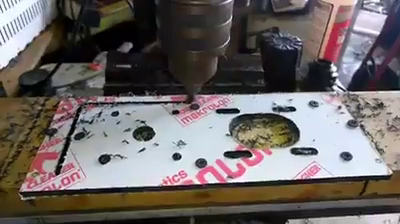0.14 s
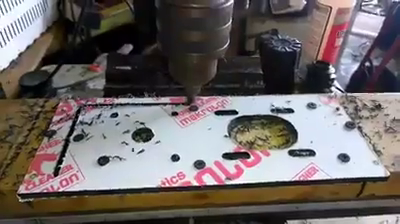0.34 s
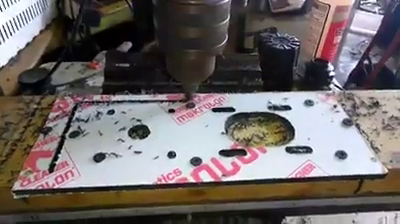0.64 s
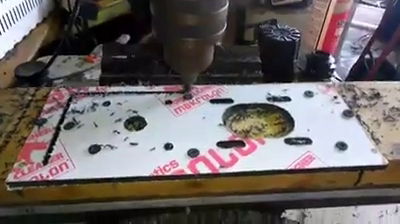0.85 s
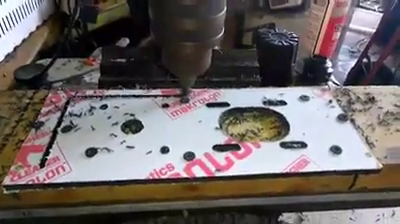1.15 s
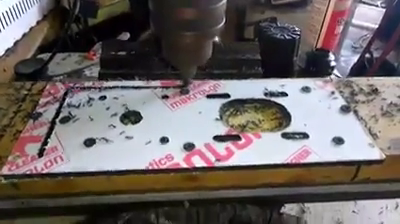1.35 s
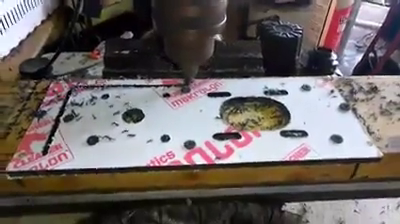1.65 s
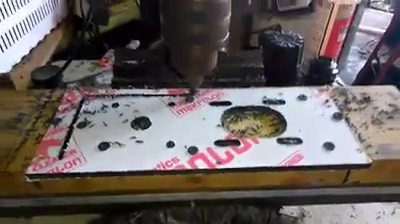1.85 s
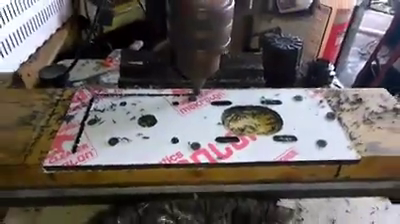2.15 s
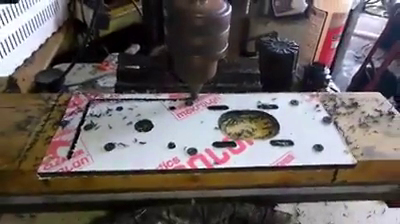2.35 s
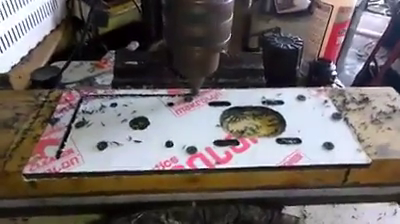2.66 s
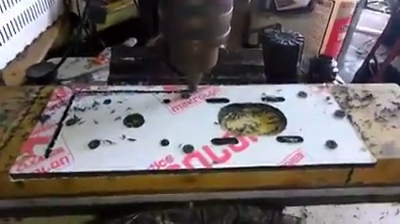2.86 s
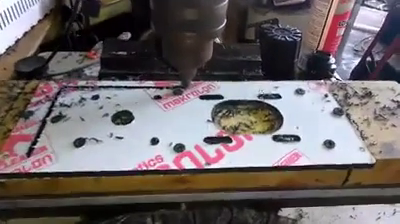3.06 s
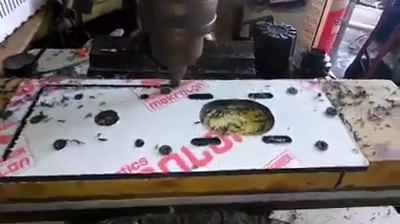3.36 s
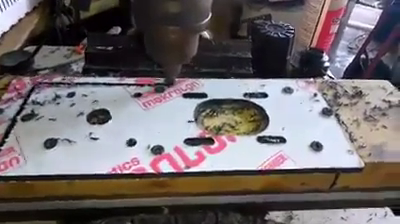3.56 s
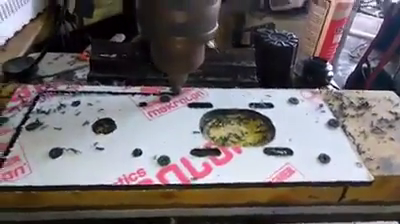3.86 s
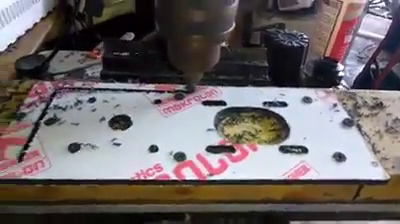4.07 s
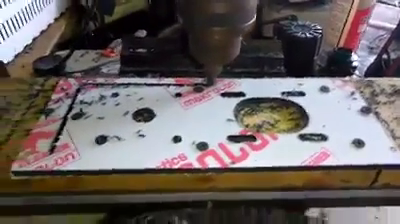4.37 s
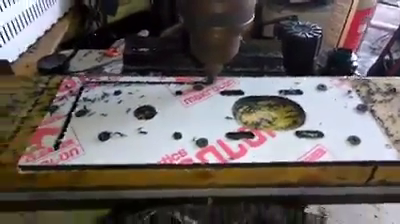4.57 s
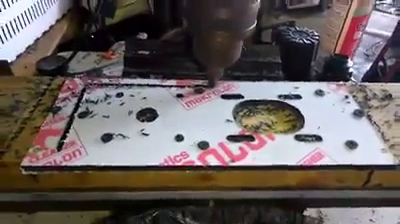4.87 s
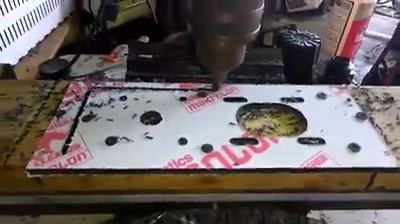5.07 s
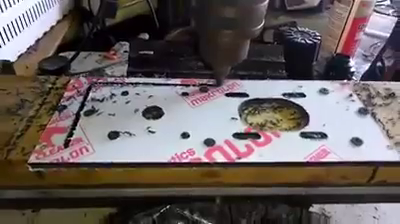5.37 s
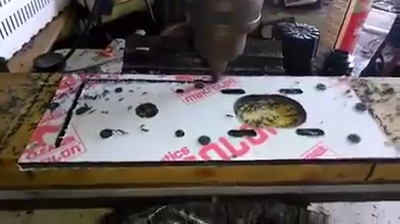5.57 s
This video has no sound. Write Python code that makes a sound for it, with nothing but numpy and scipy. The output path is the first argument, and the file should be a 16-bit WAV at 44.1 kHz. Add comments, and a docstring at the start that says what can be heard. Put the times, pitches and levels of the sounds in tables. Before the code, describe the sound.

A loud bright hiss of rushing air on the left covers a router spindle rasping and droning as it mills a plastic sheet.

```python
"""In a small workshop, heard from close by, a router spindle mills a plastic sheet.
Rasp, ringing, chips and snaps are shaped noise paced by the two flutes; they ease while the load is light.
The spindle drones on sines and resonant noise; thin high tones and runs of treble chatter come and go.
A loud hiss of rushing air, coloured noise, lies on the left and eases near the end; soft knocks are short
low cosines with added noise. The highest peaks clip."""
import sys
import numpy as np
from scipy import signal
from scipy.fft import rfft, irfft, next_fast_len
from scipy.io import wavfile

SR = 44100
rng = np.random.default_rng(int(sys.argv[2]) if len(sys.argv) > 2 else 0)


def log_audio(samples):
    """Write samples as a 16-bit WAV file to the path given in sys.argv[1]."""
    # one column per channel
    frames = np.atleast_2d(samples).T
    # limit to full scale, then quantise
    limited = np.clip(frames, -1, 1)
    pcm = np.round(limited * 32767).astype(np.int16)
    wavfile.write(sys.argv[1], SR, pcm)


N = 253106
TIME_S = np.arange(N) / SR

# Noise colours. Each row: frequency in Hz, relative level in dB per Hz.
SHEET_COLOUR = [(1100, 0.5), (1300, -2), (1450, -1.5), (1700, 6), (2000, 6.5), (2140, 8), (2220, -5.5),
                (2300, 12), (2480, 4.5), (2600, 2), (2780, -2), (3800, -4)]
CHIPS_COLOUR = [(2600, -10), (2780, -17), (2950, 5), (3200, 0), (3400, -7.5), (3700, 0), (4200, 2.5),
                (4700, 0.5), (5050, -4), (5300, 1.5), (5600, -2.5), (6000, 13)]
CHIPS_LATE_COLOUR = [(2600, -34), (2780, 7), (3100, -11), (3500, 5.5), (3900, 6), (4150, -3), (4400, 8),
                     (5000, 5), (5500, 14), (6000, 0)]
SNAPS_COLOUR = [(1250, -38), (1450, 5), (1700, 1.5), (2000, 8.5), (2220, 1.5), (2350, 7), (2750, -10),
                (3100, -6.5), (3450, 3), (4000, 4), (4600, -0.5), (5400, -28)]
FRAME_COLOUR = [(24, -13), (38, 1), (55, 2.5), (120, 0), (240, -7.5), (350, -5), (470, 0), (520, 8),
                (650, -0.5), (900, 0.5), (1150, -5), (1400, -1.5), (2000, -48)]
HISS_COLOUR = [(9600, -17), (10150, 0), (10400, 3.5), (11300, 0), (11900, -0.5), (12300, -0.5),
               (13100, -3.5), (14000, -2), (15200, -3.5), (18000, -4)]
HISS_EDGE_COLOUR = [(7000, -4.5), (7400, -1.5), (8700, -6.5), (9000, 1.5), (9700, 6.5), (10100, -6),
                    (10400, -15), (12000, -24)]
RUSH_COLOUR = [(5400, -47), (5900, -9), (6100, 6.5), (6700, 8), (7300, 13), (7700, 5.5), (8400, 8.5),
               (9300, 12), (10500, -2)]
KNOCK_NOISE_COLOUR = [(80, -40), (110, -1), (190, -2), (300, -1.5)]

# Response of each part to the cut. Columns: base level in dB, dB per dB of steady load, dB per dB of a catch.
RASP_RESPONSE = (-29.5, 1, 0.99)
SNAP_RESPONSE = (-33.5, 0.9, 1.1)
CHIPS_RESPONSE = (-29, 1, 0.56)
FRAME_RESPONSE = (-36.5, 0.68, 0.28)
HUM_RESPONSE = (-38.5, 1.36, 0.27)
DRONE_RESPONSE = (-39.5, 1.1, 0.05)

# Flutes catching and digging in. Each row: start in seconds, load change in dB, hold in seconds.
CATCHES = [(0.982, 3, 0.036), (1.145, 3, 0.018), (1.518, 3, 0.11), (2.236, 2, 0.16), (2.498, 10, 0.056),
           (2.73, 7, 0.026), (3.074, 12.5, 0.088), (3.205, 9.5, 0.028), (3.337, 4.5, 0.19),
           (3.435, 2.5, 0.058), (3.524, 6.5, 0.072), (3.637, 7, 0.047), (4.1, -1, 0.046),
           (4.164, 2.5, 0.12), (4.362, 1.5, 0.027), (4.481, 4.5, 0.057), (4.595, 2.5, 0.16),
           (4.885, 3.5, 0.077), (5.04, 1.5, 0.25), (5.445, 5, 0.14), (5.697, 5, 0.034)]
# Regular throb of the scrape, from once in two turns to three times a turn.
# Each row: cycles per turn, relative depth in dB (times BITE_DEPTH).
BITES = [(.5, 0.9), (1, 3.4), (2, 2.2), (3, 1.1)]
# Narrow rings of sheet and gantry. Each row: frequency in Hz, width in Hz, relative level in dB, left-right in dB.
SHEET_MODES = [(1460, 19.5, 8, 7), (1719, 35, 3.5, 14), (1883, 18, 12.5, -11), (1962, 15, 12.5, -3),
               (2032, 8.5, 7.5, -22), (2352, 32, 3, -14)]
# Brief changes of the drone. Each row: centre in seconds, change in dB.
DRONE_SWELLS = [(0.83, -7), (1.15, 7.5), (1.53, 7), (1.65, 9), (1.87, 7.5), (2.12, 11), (2.279, 16),
                (2.55, 9), (2.68, 9), (3.16, 11), (3.539, 15), (3.76, 12.5), (3.9, 5.5), (4.18, 10),
                (4.46, 5.5), (4.7, 7), (4.93, 3.5), (5.55, 9)]
# Hum sinking and swelling. Each row: centre in seconds, change in dB, bell width in seconds.
HUM_SWELLS = [(4.052, -9, 0.21), (5.608, 7, 0.12)]
# Rush swelling. Each row: centre in seconds, change in dB, bell width in seconds.
RUSH_SWELLS = [(1.556, 4, 0.013), (4.304, 4, 0.015), (5.185, 4.5, 0.055)]
# High whistles. Each row: frequency in Hz, relative level in dB.
WHISTLES = [(10911, -32), (11832, -29.5), (12012, -32), (12704, -32), (13140, -35.5), (13539, -34)]
# Thin tones that come and go. Each row: start in seconds, end in seconds, frequency in Hz, level in dB.
WHINES = [(0.58, 1.4, 5437.5, -31.5), (1.58, 2.0, 5437.5, -33), (2.0, 3.45, 5437.5, -42.5),
          (4.23, 4.41, 5080, -37), (0.8, 2.04, 6937.5, -24.5), (2.28, 2.5, 6937.5, -38),
          (4.6, 4.95, 6937.5, -34), (1.32, 1.78, 8062.5, -27), (2.28, 2.5, 8062.5, -30.5),
          (3.1, 3.3, 8062.5, -32), (1.07, 1.77, 9562.5, -23), (1.83, 2.0, 8812, -27), (2.0, 2.2, 6190, -32),
          (4.0, 4.9, 8953, -29.5), (4.0, 4.9, 9390, -29.5)]
# Noise bands that stand out for a while, high ones in the hiss and lower ones among the chips. Each row: start
# and end in seconds, low and high edge in Hz, level in dB.
BAND_SURGES = [(0.597, 2.07, 6470, 6570, -31), (0.596, 1.914, 2900, 3200, -45),
               (4.143, 4.505, 5700, 6150, -33), (4.2, 4.577, 5850, 7750, -30),
               (3.915, 4.5, 10500, 11600, -22.5), (4.6, 4.934, 7800, 8900, -23),
               (4.996, 5.73, 11070, 11550, -33.5), (5.0, 5.3, 7200, 8900, -33),
               (5.455, 5.76, 3400, 4100, -32.5)]
# Knocks on the microphone's housing. Each row: centre in seconds, level in dB, bell width in seconds,
# frequency in Hz, left-right in dB.
BUMPS = [(0.74, -30, 0.015, 67, -8), (0.771, -27, 0.0048, 115, -9), (0.786, -28, 0.004, 90, -12),
         (0.805, -25.5, 0.011, 58.4, -14), (0.904, -42.5, 0.011, 232, 14), (1.011, -39.5, 0.012, 235, 12),
         (1.79, -45.5, 0.018, 122, -16), (1.939, -30.5, 0.0083, 57.4, -20), (2.004, -32, 0.018, 55.5, -20),
         (2.097, -43, 0.023, 54.6, -17), (2.254, -40, 0.013, 58.6, -15), (2.518, -41, 0.039, 52, -22),
         (2.951, -36, 0.0071, 71, 18), (3.006, -37, 0.015, 62, 18), (3.313, -35.5, 0.02, 62.5, -16),
         (3.424, -37, 0.016, 62, -18), (3.467, -36, 0.02, 51.6, -29)]
# Treble chatter. Each row: start in seconds, end in seconds, band centre in Hz, level in dB.
CHATTERS = [(1.11, 1.7, 9980, -21), (1.076, 1.72, 10600, -28), (2.23, 2.53, 8700, -32),
            (2.98, 3.308, 8250, -36)]

TURN_HZ = 146.1
LIGHT_FROM_S, LOAD_FALL_S, LIGHT_UNTIL_S, LOAD_RISE_S = 1.863, 0.16, 3.796, 0.17
LIGHT_DB, LOAD_WAVER_DB, LOAD_DB_PER_S = -12.5, 1, -0.97
CATCH_ATTACK_S, CATCH_RELEASE_S = 0.028, 0.034
BITE_DEPTH, CHIPS_FOLLOW_BITE = 0.44, 0.13
MODE_SHIFT_DB = -0.5
RINGING_DB, RINGING_DB_PER_S = -9, 1.5  # relative to the rasp
RING_SWELL_AT_S, RING_SWELL_DB, RING_SWELL_S = 4.8, 3.5, 0.16  # the sheet rings most freely here
GRAIN_WIDTH_HZ, GRAIN_SHIFT_DB, GRAIN_SHIFT_HZ = 85, 7.5, 5
CHIPS_SHIFT_FROM_S, CHIPS_SHIFT_S = 4, 1.05
JUDDER_HZ, JUDDER_WIDTH_HZ, JUDDER_DB = 28, 16, 1.3
SNAP_DECAY_S, SNAP_SPREAD_DB, SECOND_FLUTE_DB = 0.0019, 2.2, -7
BEARING_HZ, BEARING_DB, BEARING_DIP_DB = 763, -10.5, -9  # levels relative to the rumble response
BEARING_QUIET_FROM_S, BEARING_QUIET_UNTIL_S = 1.9, 4.95
HOUSING_HZ, HOUSING_WIDTH_HZ = 571, 26
ORDER_DB = 0.3  # fourth multiple, relative to the drone response
DRONE_DB_PER_S, SWELL_S = 1.38, 0.017
GANTRY_HZ, GANTRY_WIDTH_HZ = 281, 140
GANTRY_DB, GANTRY_DB_PER_S = -9.5, 0.5  # relative to the rumble response
EASE_AT_S, EASE_S, HISS_EASE_DB, RUSH_EASE_DB = 4.89, 0.22, -12, -8
HISS_DB, RUSH_DB, RUSH_FOLLOWS_LOAD = -12, -22.5, 0.078
EDGE_DB, EDGE_DIP_FROM_S, EDGE_DIP_UNTIL_S, EDGE_FADE_S = -20.5, 1.06, 1.84, 0.18
EDGE_DIP_DB, RUSH_DIP_DB = -15, -1.5
RIGHT_LATE_S = 0.00062
WHISTLE_DB, WHISTLE_EASE_DB, WHINE_FADE_S = -0.5, -8, 0.09
SURGE_FADE_S = 0.091
KNOCK_NOISE_DB, KNOCK_NOISE_GROWTH = 13.5, 1.83  # noise of a 0 dB knock; dB per dB of knock
CHATTERS_PER_S, CHATTER_WIDTH_HZ, CHATTER_UNEVEN_S = 12.5, 380, 0.012
START_S, FADE_IN_S, OPENING_GAIN, CUTOFF_HZ = 0.4696, 0.22, 0.14, 15400


def from_db(db):
    """Amplitude ratio of a level in dB."""
    return 10 ** (np.asarray(db) / 20)


def rms_one(x):
    """Scale to rms 1 over all channels."""
    return x / np.sqrt(np.mean(x ** 2) + 1e-20)


def drift(rate_hz):
    """Slow chance of rms about 1: two-pole smoothed noise on a grid of 40 samples."""
    r = np.exp(-80 * np.pi * rate_hz / SR)
    white = rng.standard_normal(N // 40 + 2002)
    slow = signal.lfilter([1], [1, -2 * r, r * r], white)[2000:]  # skip the settling
    return np.interp(np.arange(N) / 40, np.arange(len(slow)), rms_one(slow))


def ramp(start_s, length_s):
    """Rises evenly from 0 to 1."""
    return np.clip((TIME_S - start_s) / length_s, 0, 1)


def swell(centre_s, width_s):
    """Bell-shaped rise and fall of height 1."""
    return np.exp(-.5 * ((TIME_S - centre_s) / width_s) ** 2)


def gate(start_s, end_s, fade_s):
    """Opens and closes evenly, half open at start and end."""
    return np.clip(np.minimum(TIME_S - start_s, end_s - TIME_S) / fade_s + .5, 0, 1)


def pan(left_db):
    """Left and right gains with mean power 1, left_db apart."""
    return rms_one(from_db(np.array([[left_db], [-left_db]]) / 2))


def from_left(x):
    """A sound from the left reaches the right ear later."""
    return np.array([x[0], np.roll(x[1], int(RIGHT_LATE_S * SR))])


def noise_pair(alike):
    """White noise for two ears with the given correlation."""
    mid, side = rng.standard_normal((2, N))
    alike = np.clip(alike, -1, 1)
    return rms_one(np.sqrt(1 + alike) * mid + np.sqrt(1 - alike) * side * [[1], [-1]])


def colour(x, spectrum):
    """Shape a noise, with steep skirts beyond the spectrum's ends; rms 1."""
    size = next_fast_len(N)
    hz = np.arange(size // 2 + 1) * SR / size + 1
    points = np.array(spectrum)
    level_db = np.interp(np.log(hz), np.log(points[:, 0]), points[:, 1])
    skirts = 1 / (1 + (points[0, 0] / hz) ** 12) / (1 + (hz / points[-1, 0]) ** 12)
    return rms_one(irfft(rfft(x, size) * from_db(level_db) * skirts, size)[..., :N])


def resonate(x, hz, width_hz):
    """One two-pole resonance with gain about 1 on top."""
    r = np.exp(-np.pi * width_hz / SR)
    feedback = [1, -2 * r * np.cos(2 * np.pi * hz / SR), r * r]
    return signal.lfilter(np.array([1, 0, -1]) * (1 - r * r) / 2, feedback, x)


def resonate_twice(x, hz, width_hz):
    """Two equal resonances in series, for steeper flanks."""
    return resonate(resonate(x, hz, width_hz), hz, width_hz)


def tone(angle, waver_db, wander_rad, lag_rad=0):
    """A stereo sine of rms 1 that wavers in level and phase."""
    phase = angle + wander_rad * drift(9.3) + rng.uniform(0, 2 * np.pi)
    return rms_one(from_db(waver_db * drift(26.5)) * np.sin(phase - np.array([[0], [lag_rad]])))


def reflect(x, echo_db, sway_s, count=4):
    """Echoes off bed and gantry comb the sound; their delays sway with the hand-held microphone."""
    out, samples = x.copy(), np.arange(N)
    for delay_s in np.geomspace(.004, .022, count) * rng.uniform(.85, 1.15, count):
        read = samples - SR * (delay_s + sway_s * drift(.4))
        out += from_db(echo_db) * np.array([np.interp(read, samples, ear) for ear in x])
    return rms_one(out)


def cutting_load():
    """Cutter load in dB: a steady part (heavy, light, heavy again) and short changes where flutes catch."""
    light = ramp(LIGHT_FROM_S, LOAD_FALL_S) - ramp(LIGHT_UNTIL_S, LOAD_RISE_S)
    catch_db = LOAD_WAVER_DB * drift(14.0)
    for start_s, db, hold_s in CATCHES:
        release = np.exp(-np.maximum(TIME_S - start_s - hold_s, 0) / CATCH_RELEASE_S)
        catch_db = catch_db + db * ramp(start_s, CATCH_ATTACK_S) * release
    return LIGHT_DB * light + LOAD_DB_PER_S * TIME_S, catch_db


def sheet_ringing(scrape):
    """Scraping excites the sheet's narrow modes, whose levels drift as the cutter travels."""
    out = 0
    for hz, width_hz, db, left_db in SHEET_MODES:
        level = from_db(db + MODE_SHIFT_DB * drift(0.17))
        out = out + level * pan(left_db) * resonate(scrape, hz, width_hz)
    return rms_one(out)


def treble_grain(x, count=30):
    """Narrow bands between 2.6 and 6.1 kHz that swell and fade by chance, giving a grainy treble."""
    out = 0
    for hz in np.geomspace(2600, 6100, count) * rng.uniform(.99, 1.01, count):
        level = from_db(GRAIN_SHIFT_DB * np.tanh(drift(GRAIN_SHIFT_HZ)))
        out = out + level * resonate_twice(x, hz, GRAIN_WIDTH_HZ)
    return out


def chip_spray(bite_db):
    """Chips spray off the flutes in dense, uneven showers; their colour shifts late in the pass."""
    spray = noise_pair(alike=0.19) * from_db(CHIPS_FOLLOW_BITE * bite_db + drift(40))
    early = colour(treble_grain(spray), CHIPS_COLOUR)
    late = colour(reflect(spray, echo_db=2.5, sway_s=.00002), CHIPS_LATE_COLOUR)
    shift = ramp(CHIPS_SHIFT_FROM_S, CHIPS_SHIFT_S)
    return (1 - shift) * early + shift * late


def cutter(angle, rasp_db, chips_db):
    """Each flute bites once a turn, one deeper than the other, and sets the sheet ringing."""
    bite_db = BITE_DEPTH * sum(db * np.cos(cycles * angle) for cycles, db in BITES)
    bites = from_db(bite_db + drift(39))
    ringing = sheet_ringing(noise_pair(alike=0.82) * bites)
    rasp = reflect(colour(noise_pair(alike=0.36) * bites, SHEET_COLOUR), echo_db=-3.0, sway_s=0.0001)
    ringing_db = RINGING_DB + RINGING_DB_PER_S * TIME_S + RING_SWELL_DB * swell(RING_SWELL_AT_S, RING_SWELL_S)
    sheet = from_db(1.5) * rasp * pan(-1.2) + from_db(ringing_db) * ringing
    return from_db(rasp_db) * sheet + from_db(chips_db + 4.5) * chip_spray(bite_db) * pan(11.8)


def snaps(angle):
    """Each flute snaps off a chip as it enters the cut: a dry, bright crack of uneven strength."""
    flute = np.floor(angle / np.pi)
    enters = np.diff(flute, prepend=0) > 0
    spread_db = SNAP_SPREAD_DB * np.clip(rng.standard_normal(N), -2, 2)
    strength = enters * from_db(spread_db + SECOND_FLUTE_DB * (flute % 2))
    cracks = signal.lfilter([1], [1, -np.exp(-1 / (SNAP_DECAY_S * SR))], strength)
    return colour(noise_pair(alike=0.15) * cracks, SNAPS_COLOUR) * pan(-1.2)


def bearing_tone():
    """The bearing's thin tone, a wavering sine that is quieter mid-pass."""
    quiet = ramp(BEARING_QUIET_FROM_S, .1) - ramp(BEARING_QUIET_UNTIL_S, 0.16)
    sine = tone(2 * np.pi * BEARING_HZ * TIME_S, waver_db=7.0, wander_rad=0.24, lag_rad=3.9)
    return from_db(BEARING_DB + BEARING_DIP_DB * quiet) * sine * pan(23)


def spindle(angle, frame_db, hum_db, drone_db):
    """The frame rumbles; imbalance hums once a turn and the fourth multiple meets a housing resonance."""
    rumble = from_db(2.5) * colour(noise_pair(alike=-0.45), FRAME_COLOUR) * pan(6.6)
    hum = tone(angle, waver_db=4.5, wander_rad=0.12, lag_rad=2.43) * pan(5.4)
    housing = rms_one(resonate_twice(noise_pair(alike=0.0061), HOUSING_HZ, HOUSING_WIDTH_HZ))
    fourth = tone(4 * angle, waver_db=1.2, wander_rad=0.18, lag_rad=4.46)
    drone = (from_db(ORDER_DB) * fourth + from_db(-3.5) * housing) * pan(8.2)
    boom = rms_one(resonate_twice(noise_pair(alike=-0.76), GANTRY_HZ, GANTRY_WIDTH_HZ))
    gantry = from_db(GANTRY_DB + GANTRY_DB_PER_S * TIME_S) * boom * pan(4.0)
    frame = rumble + gantry + bearing_tone()
    return from_db(frame_db) * frame + from_db(hum_db) * hum + from_db(drone_db) * drone


def air(eased, load_db):
    """Turbulent air close to the left ear: a bright hiss over a lower rush, both fluttering."""
    dip = ramp(EDGE_DIP_FROM_S, EDGE_FADE_S) - ramp(EDGE_DIP_UNTIL_S, EDGE_FADE_S)
    hiss_db = HISS_DB + HISS_EASE_DB * eased + 0.72 * drift(27)
    edge_db = EDGE_DB + EDGE_DIP_DB * dip + RUSH_EASE_DB * eased
    rush_db = RUSH_DB + RUSH_EASE_DB * eased + RUSH_FOLLOWS_LOAD * load_db + RUSH_DIP_DB * dip
    rush_db += sum(db * swell(centre_s, width_s) for centre_s, db, width_s in RUSH_SWELLS)
    rush_db += 2.24 * drift(23)
    hiss = reflect(colour(noise_pair(alike=1.0), HISS_COLOUR), echo_db=-8.5, sway_s=.00002)
    edge = colour(noise_pair(alike=0.63), HISS_EDGE_COLOUR)
    rush = reflect(colour(noise_pair(alike=0.34), RUSH_COLOUR), echo_db=-5.5, sway_s=.00008)
    flow = from_db(hiss_db) * hiss + from_db(edge_db) * edge + from_db(rush_db) * rush
    return from_left(flow * pan(17.4))


def high_tones(eased):
    """Thin sine whines come and go over lasting whistles, which soften when the air eases."""
    out = 0
    for hz, db in WHISTLES:
        out = out + from_db(db) * tone(2 * np.pi * hz * TIME_S, waver_db=4.0, wander_rad=0.57, lag_rad=0.97)
    out = out * from_db(WHISTLE_DB + WHISTLE_EASE_DB * eased)
    for start_s, end_s, hz, db in WHINES:
        whine = tone(2 * np.pi * hz * TIME_S, waver_db=2.5, wander_rad=0.051, lag_rad=3.7)
        out = out + from_db(db) * gate(start_s, end_s, WHINE_FADE_S) * whine
    return out * pan(18)


def band_surges():
    """Bands of filtered noise stand out for a while: the high ones shift the colour of the hiss, the lower ones
    that of the chips."""
    out = 0
    for start_s, end_s, low_hz, high_hz, db in BAND_SURGES:
        band_pass = signal.butter(2, np.sort([low_hz, high_hz]), "band", fs=SR, output="sos")
        band = rms_one(signal.sosfilt(band_pass, noise_pair(alike=0.36)))
        out = out + from_db(db) * gate(start_s, end_s, SURGE_FADE_S) * band
    return from_left(out * pan(21))


def bumps():
    """Handling knocks rock the microphone's housing: brief low cosines; harder knocks add more noise."""
    noise = from_db(KNOCK_NOISE_DB) * colour(noise_pair(alike=0), KNOCK_NOISE_COLOUR)
    out = 0
    for centre_s, db, width_s, hz, left_db in BUMPS:
        thud = from_db(db) * np.sqrt(2) * np.cos(2 * np.pi * hz * (TIME_S - centre_s))
        knock = thud + from_db(KNOCK_NOISE_GROWTH * db) * noise
        out = out + pan(left_db) * swell(centre_s, width_s) * knock
    return out


def chatter():
    """The treble chatters in short runs: narrow bands of noise that pulse about a dozen times a second."""
    out = 0
    for start_s, end_s, hz, db in CHATTERS:
        beat = CHATTERS_PER_S * (TIME_S - start_s + CHATTER_UNEVEN_S * drift(10))
        pulses = np.abs(np.sin(np.pi * beat)) * ramp(start_s, .02) * (1 - ramp(end_s, .02))
        band = rms_one(resonate_twice(rng.standard_normal(N), hz, CHATTER_WIDTH_HZ))
        out = out + from_db(db) * pulses * band
    return from_left(out * pan(14))


def scene():
    """The spindle turns at a nearly even speed; rasp, snaps and drone follow its angle and the load."""
    angle = 2 * np.pi * np.cumsum(TURN_HZ + .2 * drift(1)) / SR
    load_db, catch_db = cutting_load()
    eased = ramp(EASE_AT_S, EASE_S)

    def respond(response):
        """Level in dB under the present load."""
        base_db, follows, jumps = response
        return base_db + follows * load_db + jumps * catch_db

    drone_db = respond(DRONE_RESPONSE) + DRONE_DB_PER_S * TIME_S
    drone_db += sum(db * swell(centre_s, SWELL_S) for centre_s, db in DRONE_SWELLS)
    hum_db = respond(HUM_RESPONSE)
    hum_db += sum(db * swell(centre_s, width_s) for centre_s, db, width_s in HUM_SWELLS)
    # the sheet judders under the cutter
    judder_db = JUDDER_DB * rms_one(resonate(rng.standard_normal(N), JUDDER_HZ, JUDDER_WIDTH_HZ))
    cut = cutter(angle, respond(RASP_RESPONSE) + judder_db, respond(CHIPS_RESPONSE))
    cut = cut + from_db(respond(SNAP_RESPONSE) + judder_db) * snaps(angle)
    machine = cut + spindle(angle, respond(FRAME_RESPONSE), hum_db, drone_db)
    return machine + air(eased, load_db) + high_tones(eased) + band_surges() + bumps() + chatter()


def record(dry):
    """The input opens after a moment of silence and fades up, peaks overload, the top is cut."""
    fade = OPENING_GAIN + (1 - OPENING_GAIN) * ramp(START_S, FADE_IN_S)
    opened = dry * ramp(START_S, 0.012) * fade
    low_pass = signal.ellip(12, .1, 80, CUTOFF_HZ, fs=SR, output="sos")
    return signal.sosfilt(low_pass, np.clip(opened, -1.2, 1.2))


dry = scene()
out = record(dry)
log_audio(out)
```